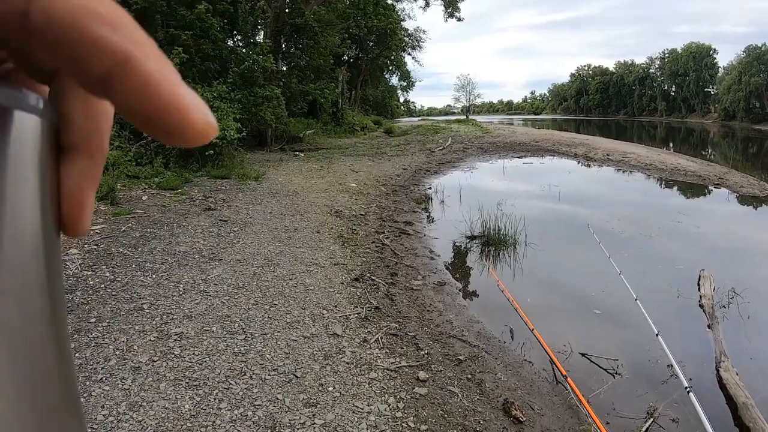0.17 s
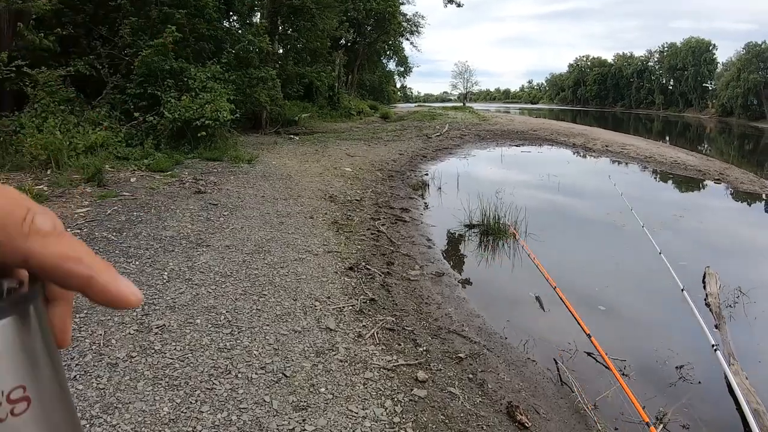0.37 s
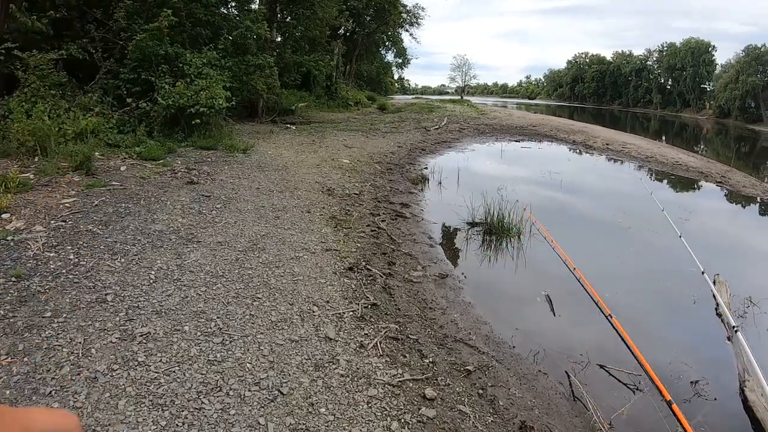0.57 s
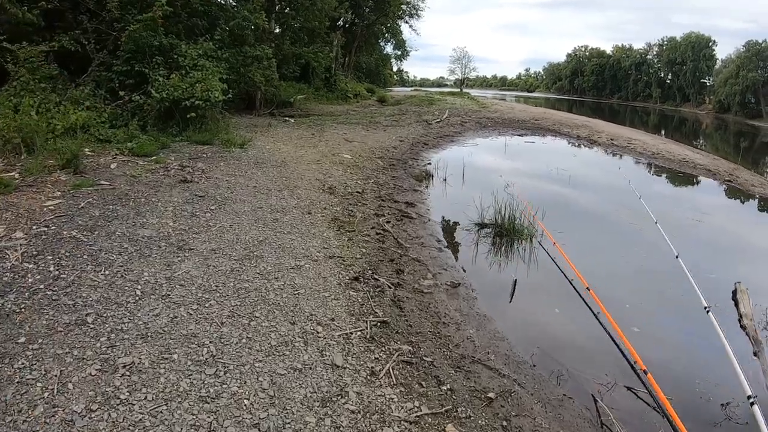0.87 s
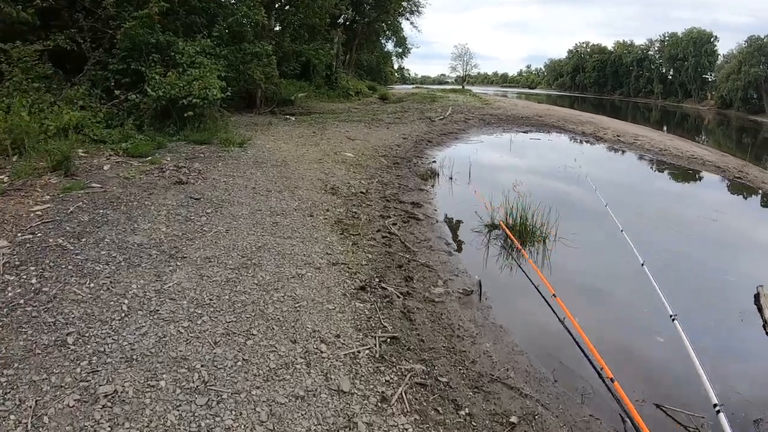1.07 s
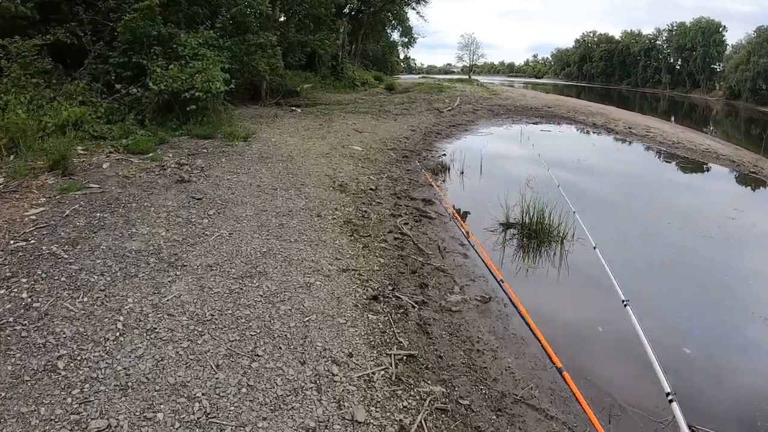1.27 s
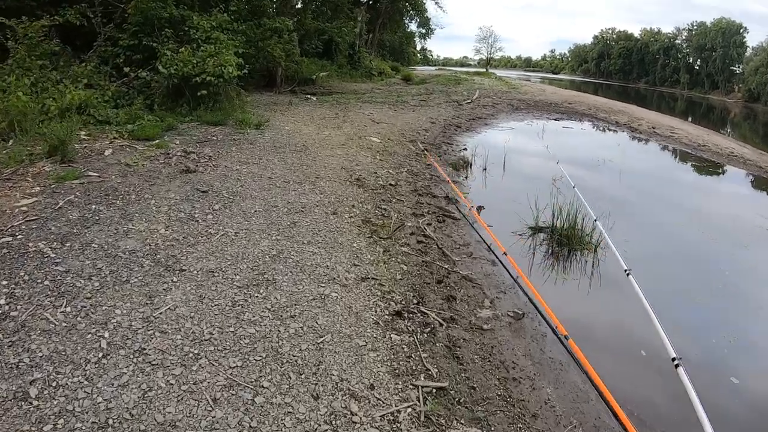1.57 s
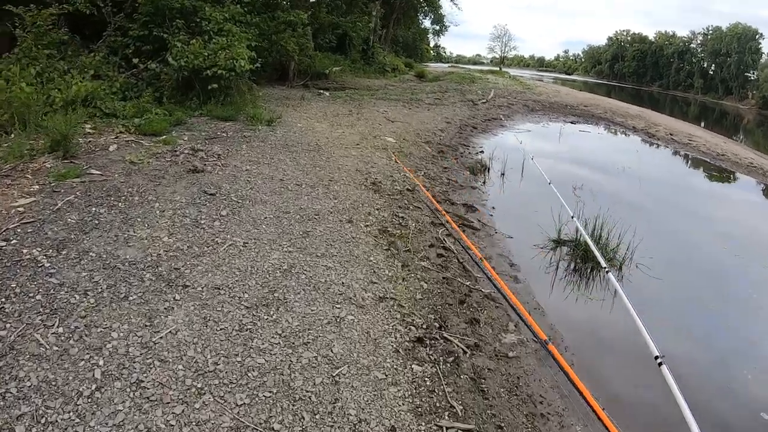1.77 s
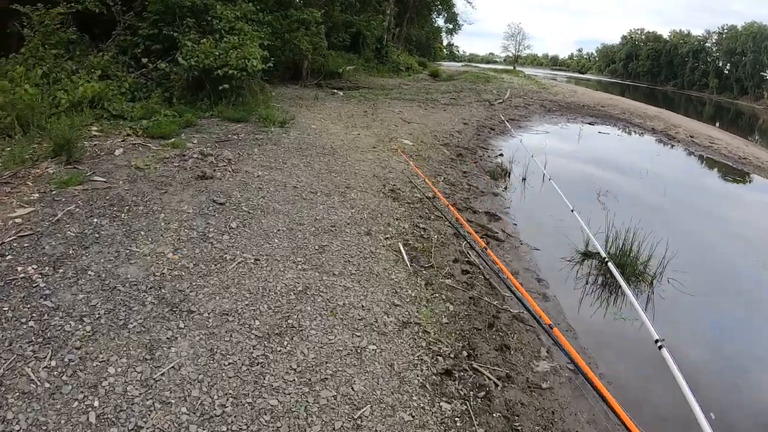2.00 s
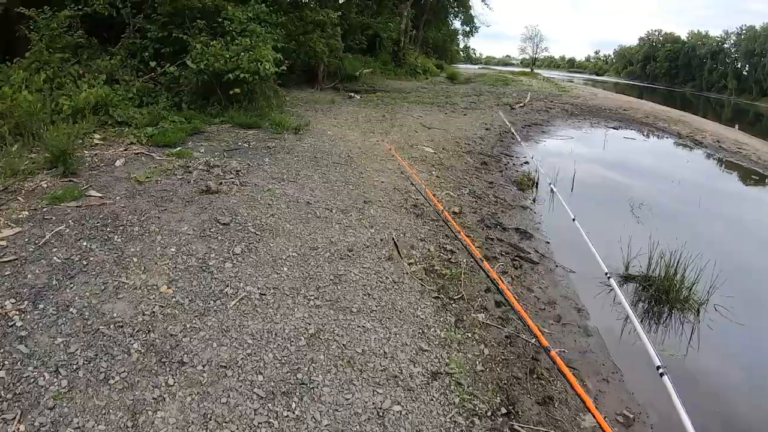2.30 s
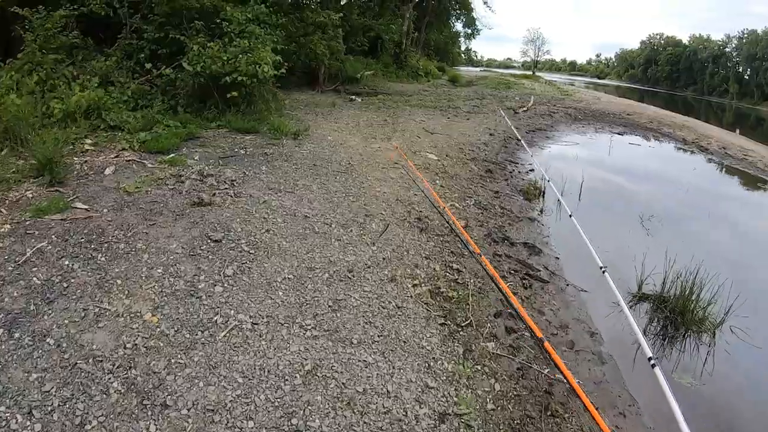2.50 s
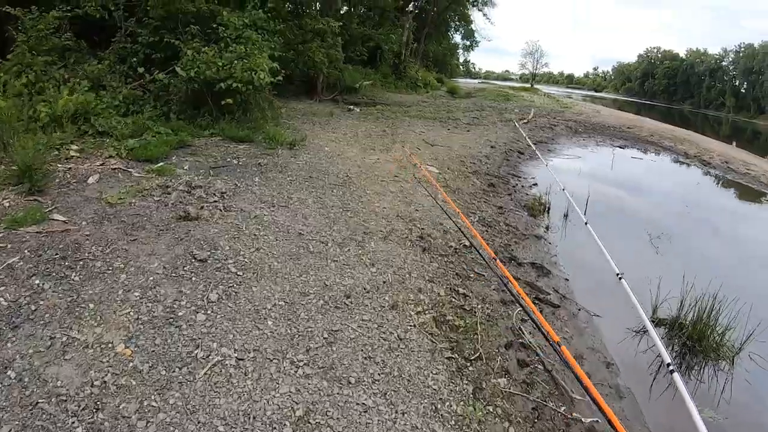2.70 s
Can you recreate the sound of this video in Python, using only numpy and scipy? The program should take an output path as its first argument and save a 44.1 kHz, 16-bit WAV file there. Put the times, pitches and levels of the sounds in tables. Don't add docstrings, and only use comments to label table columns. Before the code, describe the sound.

Close, muffled outdoor sound of someone walking on a stony riverbank: crunching grit, cracking shells, knocking pebbles and brief squeaks, with faint early bird chirps and a low engine hum growing stronger midway.

```python
import sys
import numpy as np
from scipy import signal
from scipy.io import wavfile
from scipy.ndimage import uniform_filter1d

SR = 44100
rng = np.random.default_rng(int(sys.argv[2]) if len(sys.argv) > 2 else 0)


def dump(signal):
    limited = np.clip(np.atleast_2d(signal).T, -1, 1)
    pcm = np.round(limited * 32767).astype(np.int16)
    wavfile.write(sys.argv[1], SR, pcm)


def to_linear_factor(level_db):
    exponent = np.asarray(level_db, float) / 20
    return 10 ** exponent


N = 125685

# start_s, length_s, grind_db, thud_db, fizz_db
STEPS = [(0.404, 0.3, -49, -38.5, -75.5), (0.698, 0.11, -65, -56, -81.5), (.845, 0.04, -54, -59, -71.5),
         (1.045, 0.38, -46.5, -42, -73), (1.387, 0.13, -46.5, -46.5, -78.5),
         (1.463, 0.27, -48.5, -43.5, -78), (1.655, 0.14, -44, -40.5, -73), (1.86, 0.065, -58, -33, -82),
         (1.834, 0.08, -50.5, -42.5, -74), (1.91, 0.081, -54, -36.5, -90.5), (1.994, 0.038, -62, -41, -89),
         (2.046, 0.13, -74, -36.5, -95), (2.126, 0.14, -54, -43.5, -77), (2.261, 0.13, -51, -37, -74),
         (2.45, 0.15, -47.5, -45.5, -78.5), (2.554, 0.18, -48.5, -52, -78), (2.595, .025, -63, -52, -68.5),
         (2.17, 0.024, -64, -52, -69), (1.497, 0.023, -63, -45, -77), (1.867, 0.037, -62, -47.5, -71),
         (2.697, 0.2, -47, -42.5, -82), (2.82, 0.12, -38.5, -33.5, -71)]
# start_s, length_s, level_db
DUST_PUFFS = [(.4, 0.25, -86), (.6, 0.09, -83), (.68, 0.28, -97), (1.03, 0.46, -83), (1.4, .07, -84),
              (1.47, 0.08, -78.5), (1.53, 0.28, -82.5), (1.86, .05, -78), (2.0, .05, -92),
              (2.15, 0.088, -79), (2.26, .11, -84), (2.46, .12, -87.5), (2.55, 0.14, -84),
              (2.72, .3, -86.5)]
# start_s, length_s, level_db
DRAGS = [
    (.42, 0.18, -56),
    (1.13, 0.31, -57),
    (2.43, 0.32, -56),
]
# start_s, length_s, pitch_hz, level_db
BUMPS = [
    (0.303, 0.093, 201, -33.5),
    (1.048, 0.12, 190, -35),
    (1.878, 0.14, 219, -29.5),
    (2.036, 0.21, 233, -29.5),
    (2.344, .06, 213, -37.5),
]
# time_s, peak_db, pitch_hz, spread_ratio (larger is shorter and duller)
SHELLS = [(0.4362, -25, 2110.0, 0.58), (0.4934, -13.5, 1790, 0.58), (0.669, -19.5, 1400, 0.37),
          (0.9345, -22.5, 1350, 0.35), (1.0952, -26, 1630.0, 0.57), (1.1272, -16.5, 1850.0, 0.89),
          (1.143, -10.5, 1120, 0.47), (1.1745, -22.5, 1640, 0.23), (1.4336, -22.5, 2110, 0.9),
          (1.6769, -23.5, 3030, 0.29), (1.7058, -13, 900.0, 0.73), (1.7374, -16, 1560.0, 0.43),
          (1.8311, -19.5, 1560, 0.38), (1.8813, -19, 756.5, 0.43), (2.0232, -22, 2400, 0.37),
          (2.1759, -20.5, 1270.0, 0.75), (2.2957, -16.5, 1504, 0.87), (2.334, -17, 998, 0.37),
          (2.5131, -15, 1191, 0.32), (2.7409, -34, 1360.0, 0.39), (2.7541, -24, 2230, 0.39),
          (2.8008, -18.5, 1140, 0.25)]
# time_s, peak_db, pitch_hz, spread_ratio
KNOCKS = [(.425, -27, 524, 0.48), (1.0705, -22, 700, 0.65), (1.866, -24, 750, 0.24),
          (1.887, -23.5, 570, 0.17), (1.932, -32, 800, 0.21), (1.945, -25, 423.6, .3),
          (2.078, -30, 726.5, 0.22), (2.092, -30, 520, 0.22), (2.104, -27, 705, .25),
          (2.139, -27, 380, 0.28), (2.3345, -31.5, 3560, .25), (2.143, -31, 2890, 0.18),
          (2.2768, -35, 1700, .4), (2.3526, -31, 1500, 0.46), (1.709, -26.5, 2300, 0.3),
          (.25, -50, 4200, 0.17), (2.848, -25, 1900, 0.26)]
# time_s, peak_db, pitch_hz, spread_ratio
TICKS = [(.2615, -60, 6460, 0.27), (.4355, -61, 6500, .2), (0.4805, -54, 8600, .3), (0.534, -41, 7000, .35),
         (.566, -62, 7000, .2), (.67, -53, 7500, .3), (0.762, -52, 6800, .3), (.824, -58, 7900, .06),
         (0.8535, -59, 7585, 0.081), (.873, -60, 7800, 0.064), (0.9984, -55, 7180, .2),
         (1.0948, -46.5, 7000, 0.19), (1.1269, -56, 7460, 0.17), (1.1385, -56, 7890, .08),
         (1.1509, -40, 6720, 0.14), (1.191, -47, 7800, 0.16), (1.242, -54, 7967, .07),
         (1.255, -47, 7600, 0.13), (1.3132, -52, 7300, 0.13), (1.4135, -53, 6407, 0.22),
         (1.434, -58, 6400, .25), (1.5075, -49, 10500, .4), (1.603, -64, 9480, .3),
         (1.6665, -51.5, 7780, .3), (1.709, -57, 7000, .3), (1.721, -63, 10500, .25),
         (1.8548, -57, 7400, .12), (1.8847, -48.5, 9000, .25), (2.0225, -64, 5800, .15),
         (2.1665, -61, 10710, 0.24), (2.1763, -49, 9194, .25), (2.183, -59.5, 9680, 0.31),
         (2.318, -61, 7000, .2), (2.6066, -58, 8800, .2), (2.632, -66, 10500, .25)]
# start_s, length_s, from_hz, to_hz, level_db
ROUGH_SQUEAKS = [
    (.42, 0.086, 1465, 1530, -43.5),
    (0.473, 0.19, 1640, 1590, -50.5),
    (.425, .055, 3060, 3270, -53),
    (0.47, .09, 3260, 3400, -55),
    (.435, .09, 4550, 4900, -62),
    (0.425, 0.1, 2650, 2740, -52.5),
    (0.621, 0.045, 2700, 3000, -60),
    (1.693, 0.08, 1110, 1083, -44.5),
    (2.733, 0.03, 1086, 1200, -39),
    (2.2, 0.027, 1300, 610, -43),
]
# start_s, length_s, from_hz, to_hz, level_db
SMOOTH_SQUEAKS = [
    (.185, 0.08, 2570, 2650, -67),
    (0.263, 0.09, 2616, 2740, -56),
    (.35, 0.073, 2730, 2650, -58),
    (2.41, .014, 2300, 2290, -57.5),
    (2.436, 0.024, 2390, 2366, -49.5),
    (2.464, .016, 2370, 2330, -56),
    (2.805, 0.028, 2330, 2315, -48.5),
]
# start_s, length_s, from_hz, to_hz, level_db
CHIRPS = [
    (.552, .02, 5900, 4900, -66),
    (.772, .016, 7500, 4400, -67),
    (.831, .01, 5750, 5950, -66),
    (.865, .018, 6100, 4800, -64),
    (1.3, .03, 5500, 5000, -66),
]
# time_s, pitch_hz, level_db
HUM = [(.15, 103, -46), (.36, 119.2, -31), (.56, 120.8, -36.5), (.9, 121.9, -30.5), (1.28, 117.6, -29.5),
       (1.4, 111.4, -34), (1.55, 110.6, -21), (1.6, 107.7, -36), (1.7, 108.9, -22), (1.91, 109.1, -19.5),
       (1.96, 106.9, -29.5), (2.06, 106.6, -22.5), (2.2, 106.5, -19), (2.41, 107.1, -20.5),
       (2.85, 106.5, -28.5)]
# time_s, level_db
WIND = [(.17, -36.5), (.6, -34.5), (1.33, -30.5), (1.9, -32), (2.2, -32), (2.45, -36), (2.7, -31.5),
        (2.85, -32.5)]
# pitch_hz, level_db (per Hz)
RUMBLE = [(14, -26.5), (28, -2.5), (60, 6), (125, 4.5), (166, -6), (200, -2), (300, -19), (600, -49),
          (4000, -125)]
# pitch_hz, level_db (per Hz)
AIR = [(120, -18), (200, -8.5), (800, -18.5), (1500, -26.5), (2200, -34.5), (4200, -40), (6300, -63),
       (8300, -63.5), (8900, -73.5), (11000, -77), (12500, -100)]

LEAD = 500


def evened(x):
    return x / np.sqrt(np.mean(x ** 2) + 1e-20)


def curve(rows, column):
    rows = np.array(rows)
    return np.interp(np.arange(N) / SR, rows[:, 0], rows[:, column])


def add(mix, start_s, sound):
    part = mix[round(start_s * SR):][:len(sound)]
    part += sound[:len(part)]


def swells(rows):
    power = np.zeros((len(rows[0]) - 2, N))
    for start_s, length_s, *levels_db in rows:
        arch = np.sin(np.pi * np.linspace(0, 1, round(length_s * SR)) ** 0.65)
        for row, level_db in zip(power, levels_db):
            add(row, start_s, arch ** 2 * to_linear_factor(2 * level_db))
    return np.sqrt(power)


def blip(hz, spread, phase):
    t = np.arange(-LEAD, 2 * LEAD) / SR
    width_s = 1 / (2 * np.pi * hz * spread) * np.where(t < 0, .8, 1.3)
    return np.exp(-.5 * (t / width_s) ** 2) * np.cos(2 * np.pi * hz * t + phase)


def grains(low_hz, high_hz, cycles, per_s, tilt_db, scatter_db, count=16):
    strength = to_linear_factor(scatter_db * np.minimum(rng.exponential(1, N), 5))
    hits = strength * (rng.random(N) < per_s / SR) * rng.choice([-1, 1], N)
    kind = rng.integers(0, count, N)
    out = np.zeros(N)
    for k, hz in enumerate(np.geomspace(low_hz, high_hz, count)):
        knocks = signal.oaconvolve(hits * (kind == k), blip(hz, 0.44 / cycles, k))[:N]
        out += to_linear_factor(tilt_db * k / count) * knocks
    return evened(out)


def resonate(x, hz, width_hz):
    turn = np.exp(2j * np.pi * np.cumsum(hz * np.ones(len(x))) / SR)
    r = np.exp(-np.pi * width_hz / SR)
    return 2 * (turn * signal.lfilter([1 - r], [1, -r], x / turn)).real


def wash(points, size, patchy_db):
    hz = np.fft.rfftfreq(size, 1 / SR)
    a, b, patches = rng.standard_normal((4 * N // size + 5, len(hz), 3)).T
    patches = uniform_filter1d(patches, size=10, axis=0)
    patches = evened(uniform_filter1d(patches, size=6, axis=1))
    point_hz, point_db = np.transpose(points)
    level_db = np.interp(np.log(hz + 1), np.log(point_hz + 1), point_db)
    z = (a + 1j * b) * to_linear_factor(level_db[:, None] + patchy_db * patches)
    return evened(signal.istft(z, nperseg=size, noverlap=size - size // 4)[1][:N])


def steps():
    clump = round(.012 * SR)
    clumps_db = evened(uniform_filter1d(uniform_filter1d(rng.standard_normal(N), clump), clump))
    fizz = grains(7500, 8320, cycles=8.3, per_s=12000, tilt_db=0, scatter_db=2.2)
    grit = grains(5600, 8600, cycles=6, per_s=4600, tilt_db=-4.5, scatter_db=2.2)
    fizz = (fizz + grit) * to_linear_factor(2.6 * clumps_db)
    grind = grains(1000, 4750, cycles=4.5, per_s=5000, tilt_db=-5, scatter_db=0.5) * to_linear_factor(1.3 * clumps_db)
    thud = grains(283, 990, cycles=2.22, per_s=1500, tilt_db=4.5, scatter_db=3.5)
    dust = grains(9500, 13000, cycles=9, per_s=7100, tilt_db=-11, scatter_db=2.2) * to_linear_factor(1.5 * clumps_db)
    scuff = grains(2900, 4870, cycles=7.1, per_s=15000, tilt_db=-3, scatter_db=2.2)
    crunch = (swells(STEPS) * [grind, thud, fizz]).sum(0)
    return crunch + swells(DUST_PUFFS)[0] * dust + swells(DRAGS)[0] * scuff


def bumps():
    out = np.zeros(N)
    for start_s, length_s, hz, level_db in BUMPS:
        u = np.linspace(0, 1, round(length_s * SR))
        noise = rng.standard_normal(len(u))
        thump = evened(resonate(resonate(noise, hz, 86), hz, 86))
        add(out, start_s, to_linear_factor(level_db) * np.sin(np.pi * u) * thump)
    return out


def snaps(rows, gain_db, ring, edge, body):
    out = np.zeros(N)
    phases = rng.uniform(0, 2 * np.pi, (len(rows), 2))
    for (time_s, peak_db, hz, spread), (a, b) in zip(rows, phases):
        start_s = time_s - LEAD / SR
        level = to_linear_factor(peak_db + gain_db)
        swing = blip(hz, spread, a) + edge * blip(2700, 0.22, b) + body * blip(hz / 2, spread, b)
        add(out, start_s, level * swing)
        add(out, start_s + .0025, ring * level * blip(hz * 1.2, spread * 0.63, b))
    return out


def squeaks(rows, fuzz, width_hz):
    out = np.zeros(N)
    for start_s, length_s, from_hz, to_hz, level_db in rows:
        t = np.arange(0, length_s, 1 / SR)
        hz = from_hz + (to_hz - from_hz) * t / length_s
        noise = rng.standard_normal(len(t))
        tones = []
        for k in (1, 2):
            blur = resonate(resonate(noise, k * hz, k * width_hz), k * hz, 4 * k * width_hz)
            pure = np.cos(2 * np.pi * k * np.cumsum(hz) / SR)
            tones.append(evened(pure + fuzz * evened(blur)))
        nearness = np.clip(np.minimum(t, (length_s - t) / 2) / .006, 0, 1)
        edge = np.sin(np.pi / 2 * nearness) ** 2
        add(out, start_s, to_linear_factor(level_db) * edge * (tones[0] + to_linear_factor(-28) * tones[1]))
    return out


def birds():
    out = np.zeros(N)
    for start_s, length_s, from_hz, to_hz, level_db in CHIRPS:
        u = np.linspace(0, 1, round(length_s * SR))
        hz = from_hz + (to_hz - from_hz) * u
        whistle = np.sin(2 * np.pi * np.cumsum(hz) / SR)
        add(out, start_s, to_linear_factor(level_db) * np.sin(np.pi * u) * whistle)
    return out


def hum():
    hz = curve(HUM, column=1)
    fuzz = resonate(resonate(rng.standard_normal(N), hz, width_hz=20), hz, width_hz=20)
    tone = np.sin(2 * np.pi * np.cumsum(hz) / SR)
    return to_linear_factor(curve(HUM, column=2)) * evened(tone + 0.25 * evened(fuzz))


def wind():
    return to_linear_factor(curve(WIND, column=1) + 5.0) * wash(RUMBLE, size=2048, patchy_db=-0.5)


def air():
    rise_db = -5 * np.clip(1 - (np.arange(N) / SR / 0.4) ** 4, 0, 1)
    return to_linear_factor(-38.5 + rise_db) * wash(AIR, size=512, patchy_db=0.0)


def scene():
    shells = snaps(SHELLS, gain_db=-3.5, ring=0.15, edge=.09, body=0.35)
    knocks = snaps(KNOCKS, gain_db=-2.5, ring=0.2, edge=0, body=0)
    ticks = snaps(TICKS, gain_db=-2.2, ring=0.28, edge=0, body=0)
    walking = steps() + bumps() + shells + knocks + ticks
    gear = squeaks(ROUGH_SQUEAKS, fuzz=1.1, width_hz=150) + squeaks(SMOOTH_SQUEAKS, fuzz=.45, width_hz=70)
    return (walking + gear + birds() + hum() + wind() + air())[None]


def low_pass(x):
    return signal.sosfilt(signal.butter(12, 15700, fs=SR, output="sos"), x)


def record(dry):
    fade_in = np.clip((np.arange(N) / SR - 0.12) / (0.19 - 0.12), 0, 1) ** 2
    fade_out = np.clip((N - np.arange(N)) / 60, 0, 1)
    return low_pass(dry * fade_in * fade_out)


dry = scene()
out = record(dry)
dump(out)
```